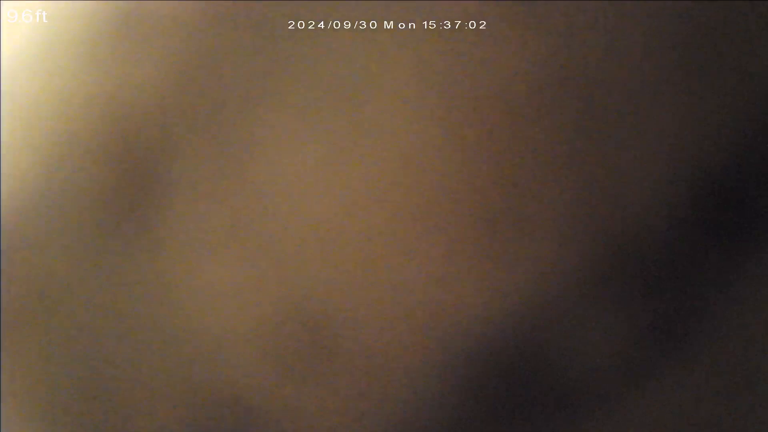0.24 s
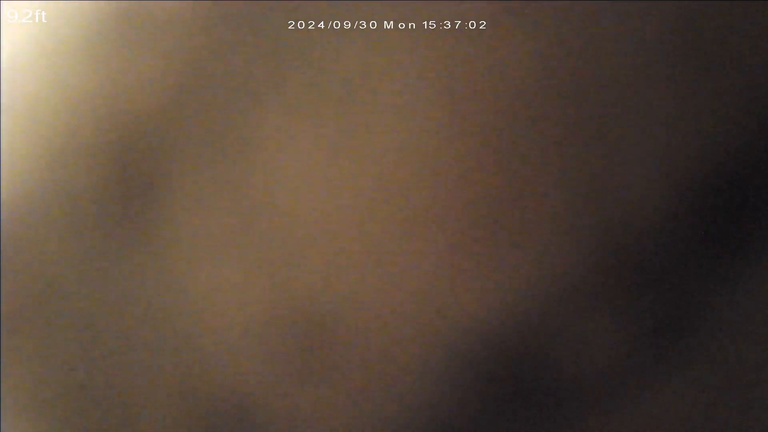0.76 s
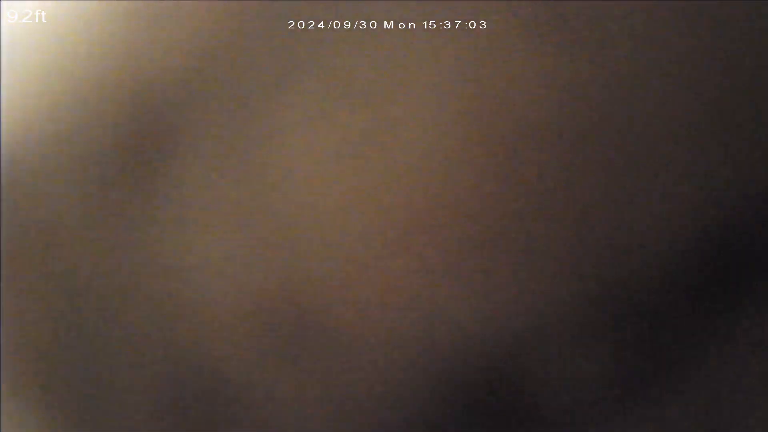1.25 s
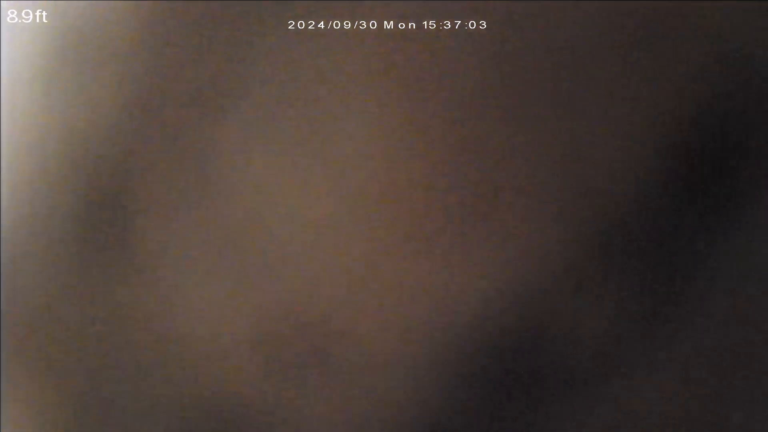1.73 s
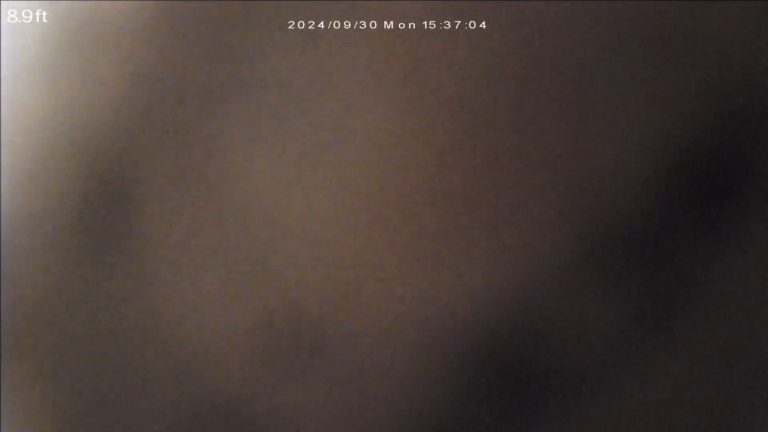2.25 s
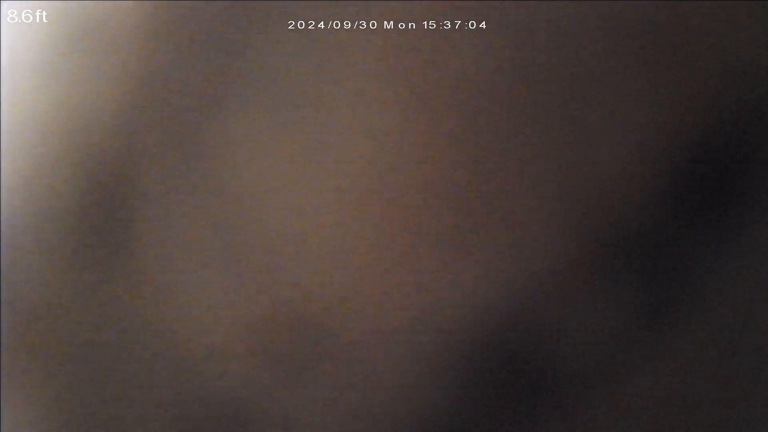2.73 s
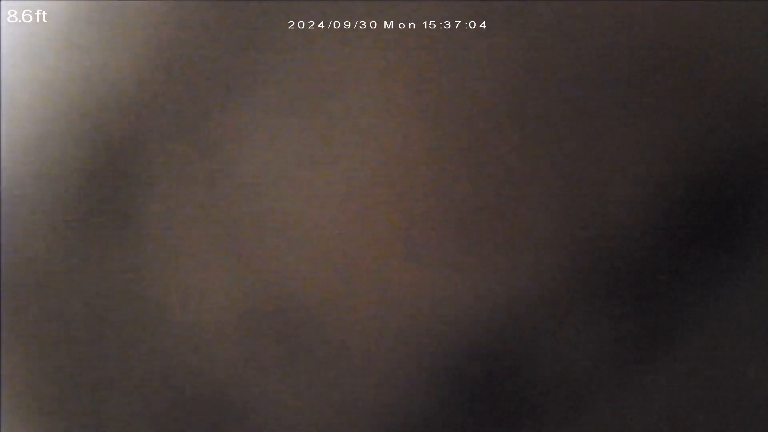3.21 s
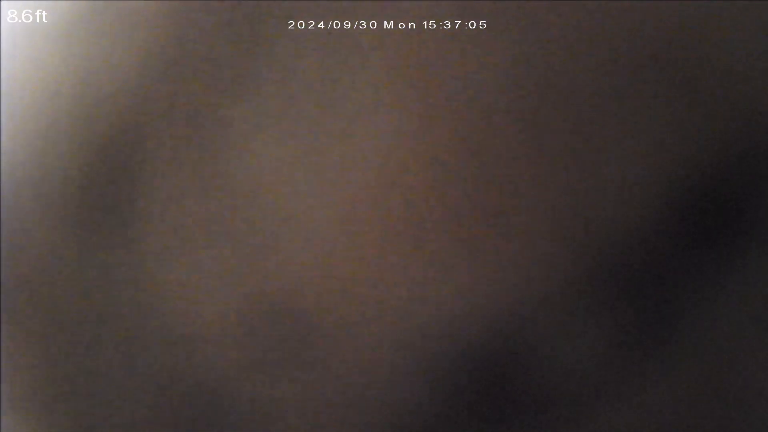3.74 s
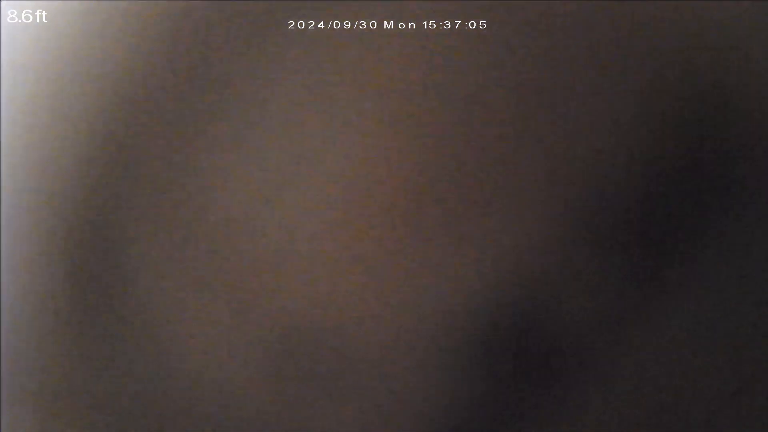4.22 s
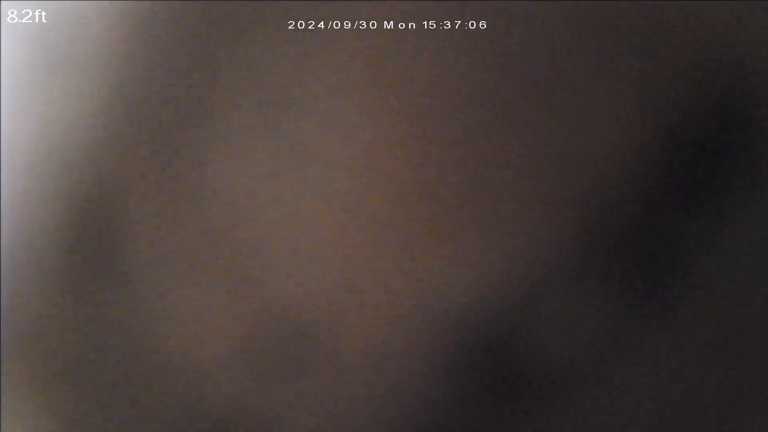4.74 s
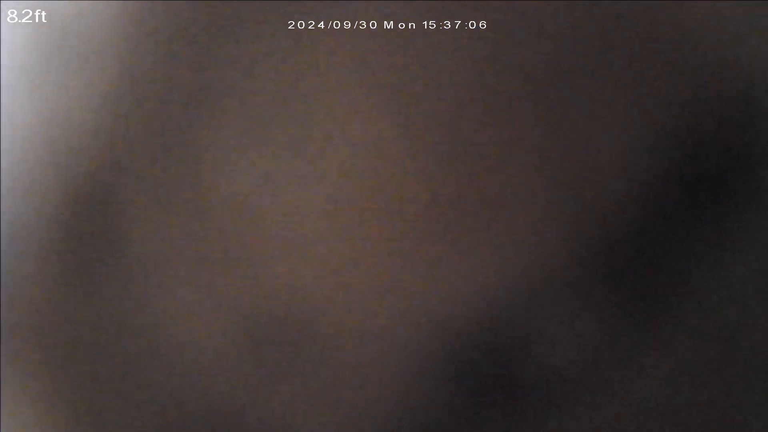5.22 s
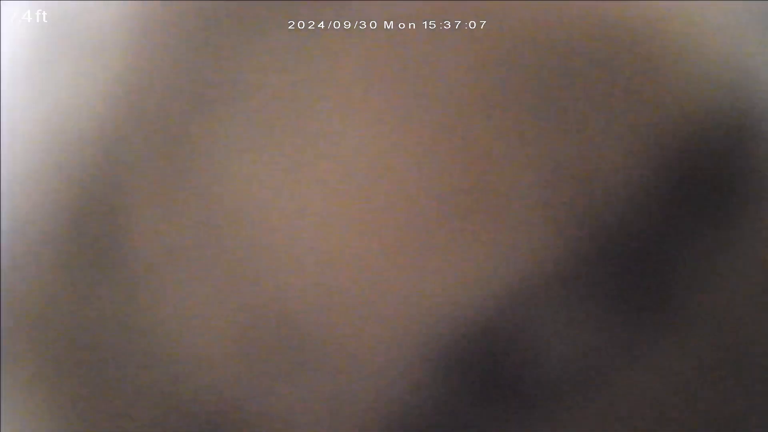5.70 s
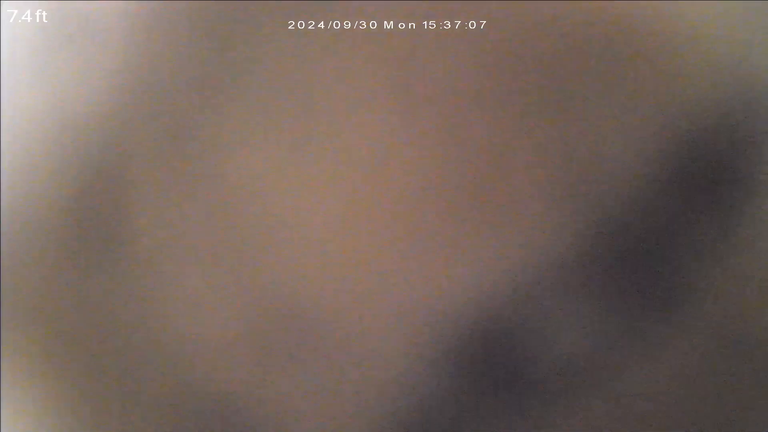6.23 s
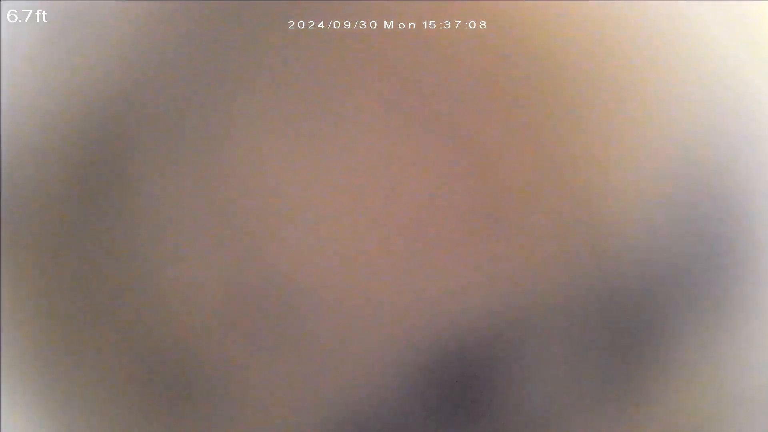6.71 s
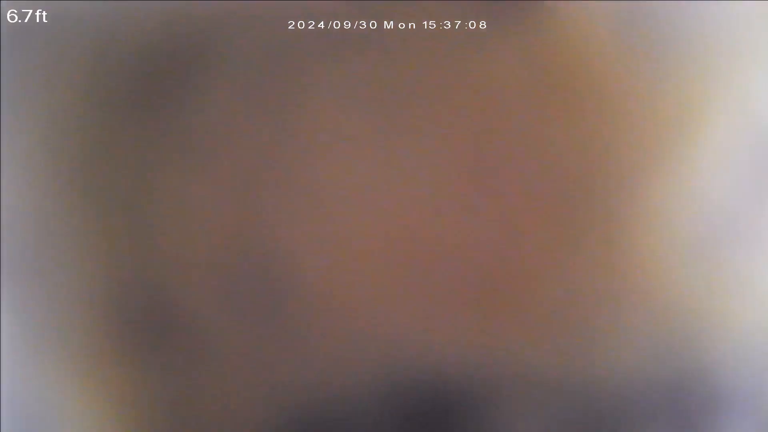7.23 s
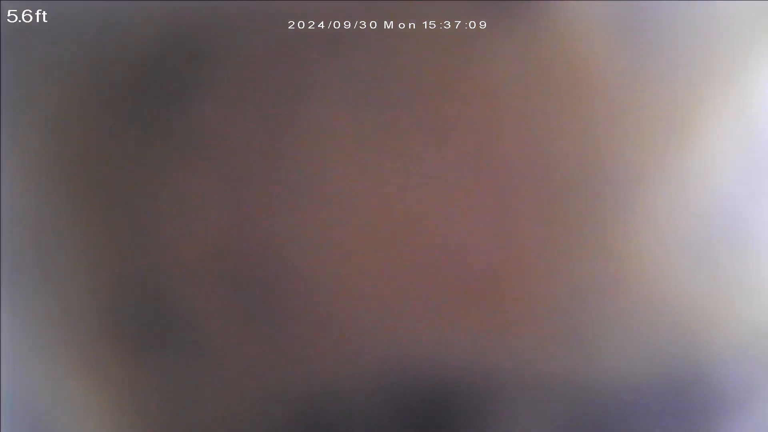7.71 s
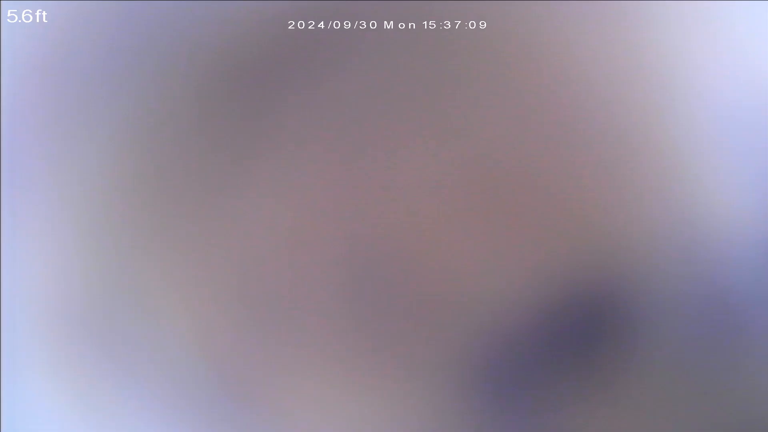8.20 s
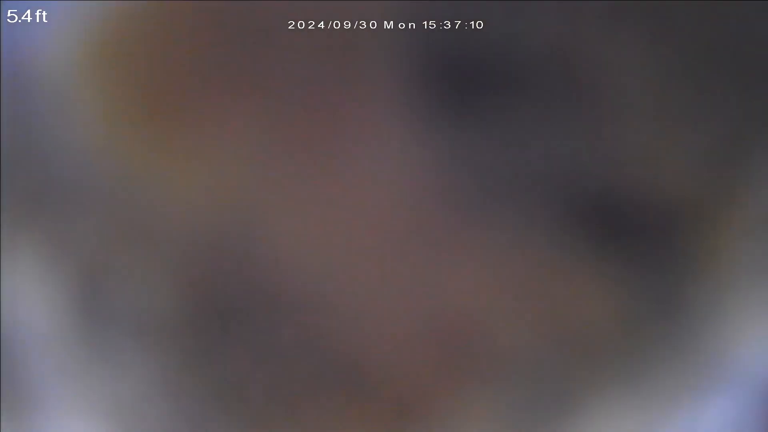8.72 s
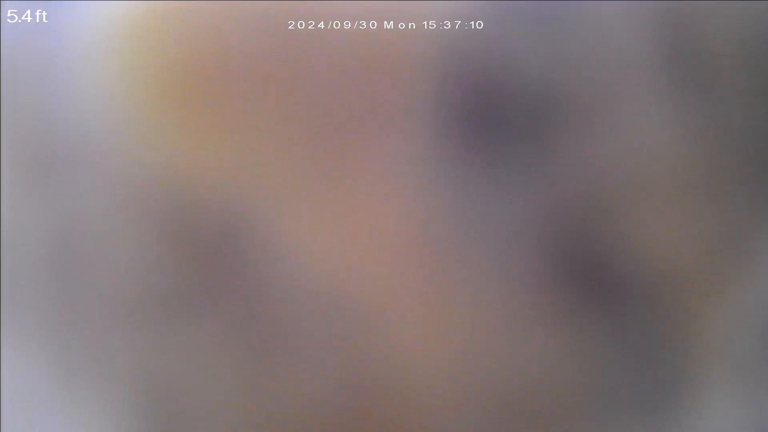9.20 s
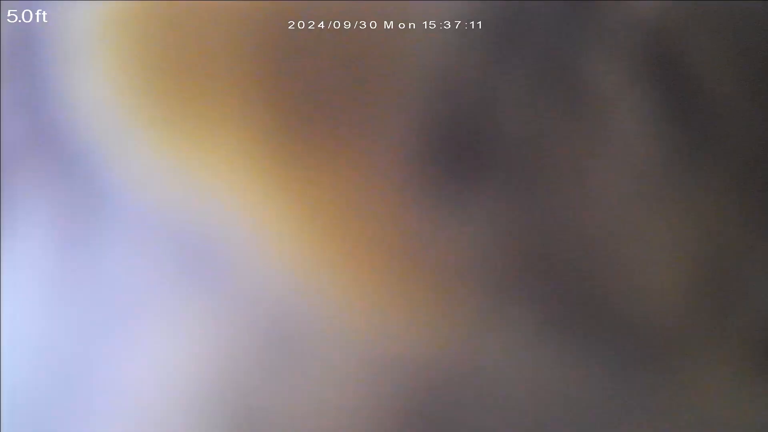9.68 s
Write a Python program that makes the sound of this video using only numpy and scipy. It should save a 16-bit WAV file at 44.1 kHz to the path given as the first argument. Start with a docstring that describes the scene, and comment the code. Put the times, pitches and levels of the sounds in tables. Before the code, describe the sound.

A small recorder in a plastic case is held in the hand pulling a stiff cable from a pipe. Irregular hollow knocks and dull thuds mix with rough scraping; the pipe rings faintly behind them. Blows come sparsely, then grow dense, and the hardest distort. A tiny metallic clink sounds early, and near the end the sound cuts out for an instant. Faint hiss lies beneath, with little room echo.

```python
"""A stiff cable is hauled out of a pipe by a hand that also holds the small recorder.
Pulls and knocks shake the plastic case (resonant modes); the sheath scrapes and blows crack (shaped noise).
The pipe rings on faintly, the room answers, a fitting clinks once; hiss and electrical pips lie beneath.
Loud blows overload the input; the sound drops out once for a moment."""
import sys
import numpy as np
from scipy import signal
from scipy.fft import rfft, irfft, next_fast_len
from scipy.io import wavfile
from scipy.ndimage import uniform_filter1d, map_coordinates

SR = 44100
rng = np.random.default_rng(int(sys.argv[2]) if len(sys.argv) > 2 else 0)


def wav_record(signal):
    """Record a signal, one row per channel, as 16-bit PCM in the file named by sys.argv[1]."""
    frames = np.transpose(np.atleast_2d(signal))
    bounded = np.clip(frames, -1, 1)
    # unit amplitude maps onto the largest positive 16-bit level
    quanta = np.round(bounded * 32767).astype(np.int16)
    wavfile.write(sys.argv[1], SR, quanta)


N = 438794

# base t60s, scaled per layer and knock: shaking; lower and upper crack
JOLT_T60_S, SNAP_T60_S = 0.065, (0.061, 0.049)


def amp(db):
    """Amplitude factor of a level in dB."""
    return 10 ** (np.asarray(db) / 20)


def unit(x):
    """x scaled to rms 1."""
    return x / np.sqrt(np.mean(x ** 2) + 1e-20)


def wobble(rate):
    """A smooth random curve, rate knots a second."""
    knots = rng.standard_normal(int(N * rate / SR) + 4)
    return map_coordinates(knots, [np.arange(N) * rate / SR])


def filtered(x, response):
    """x times a zero-phase response of frequency in Hz."""
    m = next_fast_len(N + SR // 4)
    return irfft(rfft(x, m) * response(np.fft.rfftfreq(m, 1 / SR)), m)[..., :N]


def noise(spectrum, patchy_db, split_hz=None):
    """Patchy coloured noise of rms 1 through the cavity; split: lower and upper part, each rms 1."""
    # air round the microphone: f/Hz, width/Hz, lift/dB
    air_modes = [(1220, 110, 7), (1620, 70, 4), (1900, 170, 9), (3050, 220, 5), (4500, 350, 7),
                 (5350, 450, 7), (8900, 700, 4), (10600, 900, 3)]
    z = signal.stft(rng.standard_normal(N), nperseg=256)[2]
    over_f = uniform_filter1d(rng.standard_normal(z.shape), 5, 0)
    field = uniform_filter1d(over_f, 9, 1)
    patches = signal.istft(z * amp(patchy_db * unit(field)), nperseg=256)[1][:N]
    f, level_db = np.transpose(spectrum)

    def response(hz):
        lift_db = sum(db / (1 + (2 * (hz - c) / w) ** 2) for c, w, db in air_modes)
        return amp(np.interp(np.log(hz + 1), np.log(f + 1), level_db) + lift_db)

    x = unit(filtered(patches, response))
    if split_hz is None:
        return x
    low = filtered(x, lambda hz: 1 / (1 + (hz / split_hz) ** 4))
    return unit(low), unit(x - low)


def drag():
    """Heave, rub, scrape, rasp forces: a hold plus pulls that swell, last, die; the rough sheath catches."""
    # the hand's steady hold on cable and case: t/s, heave/dB, rub/dB, scrape/dB
    grip = [(0.1, -45, -40.5, -48), (0.35, -29, -33, -57), (0.63, -33.5, -52, -62),
            (0.74, -51, -54.5, -56.5), (1.18, -22.5, -36, -57), (1.42, -31, -42, -49.5),
            (1.6, -25.5, -33, -52.5), (1.81, -37, -45, -74), (2.1, -20, -31.5, -65), (2.38, -28, -45, -65),
            (2.57, -31.5, -36.5, -48), (2.95, -33, -41, -52), (3.13, -20.5, -40, -52.5),
            (3.45, -24.5, -32.5, -45), (3.7, -34, -43, -48), (3.8, -22, -35.5, -56.5),
            (4.4, -30.5, -32.5, -39), (4.8, -41, -48.5, -55), (5.86, -33, -36.5, -57),
            (6.22, -33.5, -57.5, -51), (6.45, -25.5, -48.5, -45.5), (7.3, -24, -32.5, -53),
            (7.752, -41, -52.5, -53.5), (8.65, -30, -40.5, -57.5), (8.998, -26.5, -47, -55),
            (9.15, -33, -41, -48), (9.5, -28, -38, -50)]
    # pulls on the cable: start (full force)/s, hold/s, heave/dB, rub/dB, scrape/dB, rasp/dB
    pulls = [(0, 0.0094, -27, -20.5, -30, -36.5), (0.146, 0.035, -30, -27, -37.5, -46.5),
             (0.196, 0.049, -15, -30, -32, -73.5), (1.49, 0.03, -10, -21.5, -39, -66),
             (1.897, 0.064, -24, -33.5, -63, -65), (2.011, 0.01, -14.5, -37.5, -32, -49),
             (2.151, 0.03, -13, -25.5, -30, -45), (2.431, 0.047, -18.5, -25, -36, -44.5),
             (2.79, 0.056, -29, -34, -47, -55), (3, .05, -18.5, -29, -59, -61),
             (3.612, 0.031, -21.5, -64, -48, -75), (4.047, .06, -26, -36.5, -67, -75),
             (4.132, 0.046, -21, -18.5, -48, -64), (4.248, 0.08, -20.5, -17, -32.5, -42),
             (4.453, 0.14, -28.5, -24, -40, -45.5), (4.596, .08, -26, -36, -60, -58.5),
             (4.889, 0.033, -14, -24.5, -37, -44), (5.066, 0.055, -19.5, -29.5, -49.5, -60),
             (5.228, 0.037, -15.5, -23.5, -21.5, -34.5), (5.377, .19, -20.5, -29, -31, -37.5),
             (5.589, 0.17, -17.5, -24.5, -35, -40), (5.979, 0.075, -27, -46, -50.5, -53.5),
             (6.272, 0.041, -29, -33.5, -50.5, -51.5), (6.529, .14, -20, -27, -33.5, -40.5),
             (6.74, 0.03, -14.5, -27.5, -30, -42), (6.781, 0.04, -18.5, -19.5, -28.5, -54),
             (6.885, 0.014, -20, -4.5, -12.5, -40), (6.916, 0.078, -33.5, -20, -32, -38),
             (7.012, 0.093, -23.5, -15.5, -38.5, -47), (7.926, 0.028, -19, -23.5, -44, -60),
             (8.015, 0.091, -19, -17, -38, -38.5), (8.245, 0.034, -24, -16, -56, -36),
             (8.316, 0.19, -21.5, -21.5, -45, -46), (8.795, 0.037, -12.5, -26, -29, -55.5),
             (8.855, 0.098, -22.5, -41, -47.5, -67), (9.216, 0.11, -33, -37.5, -41, -58),
             (9.565, 0.11, -35, -33, -62, -53.5), (9.666, 0.086, -22, -17.5, -52, -53.5),
             (9.785, 0.14, -21, -20, -37.5, -43.5)]
    # decay of heave, rub, scrape, rasp: [dB/s]
    let_go_db_per_s = [221, 260, 302, 352]
    take_up_db_per_s, grip_rasp_db = 502.5, -16  # rasp of the hold is relative to its scrape
    t = np.arange(N) / SR
    s, heave, rub, scrape = np.transpose(grip)
    hold_db = [np.interp(t, s, c) for c in (heave, rub, scrape, scrape + grip_rasp_db)]
    power = amp(hold_db) ** 2
    for start, hold, *level_db in pulls:
        span = slice(max(int((start - .2) * SR), 0), int((start + hold + .4) * SR))
        swell_db = take_up_db_per_s * (t[span] - start)
        die_db = np.outer(let_go_db_per_s, start + hold - t[span])
        fade_db = np.minimum(0, np.minimum(swell_db, die_db))
        power[:, span] += amp(np.c_[level_db] + fade_db) ** 2
    grit_db = wobble(40) + 2.8 * wobble(500)
    return np.sqrt(power) * amp([1.3 * wobble(14), 2.95 * wobble(45), grit_db, grit_db])


def sheath_scrape(scrape, rasp):
    """Sheath friction: noise below about 3 kHz follows the scrape force, above it the rasp force."""
    # sheath noise before the cavity: f/Hz, relative density/dB per Hz
    sheath_colour = [(410, -24.5), (700, 3), (1210, -5), (2000, -10.5), (2700, -19.5), (5000, -31),
                     (5900, -36.5), (6500, -36), (11000, -48), (12000, -50.5), (16000, -51.5)]
    low, high = noise(sheath_colour, 2, split_hz=3000)
    return scrape * low + rasp * high


def knocks():
    """Columns of the knock table; a knock of no stated length gets 1."""
    # t/s, blow/dB, thud/dB re blow, small walls/dB re blow, crack/dB re blow,
    # upper crack/dB re crack, optional length/multiple of usual
    knock_rows = [(0.036, -23, 1.5, -22, -4, -9), (.133, -27, -2, 6, -13, -16),
                  (0.181, 5, -21.5, -1.5, -4, -2.5, 1.1), (.192, 2, -15.5, -3, -3.5, -9.5, .8),
                  (.588, -36.5, -7, -2.5, -9, -26), (0.803, -34.5, 15.5, -18, -25, -13),
                  (0.93, -42, 9, -15, 0, -21), (1.01, -25, 12.5, -9, -13, -27),
                  (1.118, -25, 16.5, -3, -10.5, -25), (1.168, -14, -6, -12, -44, -20),
                  (1.217, -13, -2, -1, -23, -46), (1.3, -25, -9, 3.5, -12, -17.5),
                  (1.378, -26, 2, -5, -8.5, -20), (1.472, 3, -2, -8, -20, -10, 1.3),
                  (1.879, -27, 12, -28, -27, -6), (1.97, -39, 8, 11.5, 0, -11),
                  (2.003, -7.5, -7, 3, -5.5, -18.5), (2.021, -11.5, 8, -3.5, -14.5, -11),
                  (2.08, -27, 0, 4.5, 1, -14.5), (2.126, -13, 0, 12, -5.5, -18.5),
                  (2.13, -4, -10, 4.5, -9, -22.5), (2.158, -10.5, -1.5, -16, -8.5, -13.5),
                  (2.214, -13, 2, -3, -20, -30), (2.4, 0, -14, 0, -13, 6, 2.7),
                  (2.571, -16, 0.5, -6.5, -22, -19), (2.599, -30.5, 12, 1, -0.5, -12),
                  (2.792, -31.5, -9, 0.5, -7, -8), (2.824, -15.5, 1, -25, -26, -2),
                  (2.889, -14.5, 1.5, -13, -38, -14), (2.986, -15, 2, -3, -12, -2.5, 1.3),
                  (3.153, -17, 4.5, -4.5, -25, -11), (3.394, -15, -1.5, -6, -30, -4),
                  (3.609, -18, 7.5, -4, -13.5, -38), (3.634, -35.5, -9, 9.5, 5, 2, .7),
                  (3.721, -20, 8, -18, -24, -16), (3.798, -21.5, 19.5, -5.5, -14.5, -6),
                  (3.819, -24.5, 15.5, -8, -11, -26), (3.93, -29, 12, 0, -5, -13),
                  (4.044, -14.5, -20, -11, -39, -9), (4.079, -9.5, -16, -34, -44, -14),
                  (4.122, -6, -5.5, -2.5, -18, -5), (4.137, -2, -0.5, -0.5, -15, -12.5),
                  (4.197, -17.5, -15, -11, -5, -21), (4.241, -19, -22.5, -13, 8.5, -20.5),
                  (4.256, -1, -18.5, 4.5, -17.5, -8), (4.326, -7.5, -27, -6, -29, -8),
                  (4.446, -16, -25, -6, -20.5, -36), (4.543, -5.5, 7, 1, -5.5, -21),
                  (4.825, -23.5, 7, -3, -10, -17), (4.883, -1, -3, -8, -12, -7, 1.05),
                  (5.053, -24, -5, -0.5, -10, -18), (5.069, -26.5, 10, -11, -4, -22),
                  (5.091, -15, 10, -0.5, -5.5, -24.5), (5.103, -14.5, 10, 2, -8.5, -31),
                  (5.179, -24, 23, 4, -3.5, -13), (5.218, -21, 14.5, -14, 10, -16.5),
                  (5.251, -24.5, 18, -6, 4, -13), (5.274, -18.5, -1, 4.5, -2, -11.5),
                  (5.322, -22.5, -5.5, 1, 4.5, -8), (5.373, 4, -13.5, -1.5, -3, -6.5, .95),
                  (5.464, -17.5, 12, -7.5, -16, 1), (5.562, -19.5, 18.5, 6.5, -25, -10),
                  (5.66, -10, -6, -28, -3, -16.5), (5.718, -10.5, -5.5, -17, 2.5, -18),
                  (5.735, -1.5, 3, -22, -7.5, -16), (5.747, -4, -6, -11.5, -7, -19.5),
                  (6.002, -30, 3, 0.5, -1, -15.5), (6.244, -27.5, 4.5, 0, -5.5, -16),
                  (6.276, -24, 12.5, 0.5, -7.5, -13), (6.526, -5.5, 2, -7.5, -21, -7.5),
                  (6.537, -14, 4, -11, -15, -19), (6.598, 3, -4.5, -5.5, -9, -24, 1.1),
                  (6.648, -6.5, -0.5, 1, -8, -24), (6.74, -13.5, 4, -6, -2.5, -14.5),
                  (6.764, -3.5, -9, -0.5, 4, -15.5, .8), (6.824, -1.5, -4, 2.5, -7, -15),
                  (6.835, -5, -3, 1, -1, -16), (6.872, 3.5, -2, 4, 1.5, -12, 1.2),
                  (6.928, 2.5, -12.5, -4.5, -27.5, -12), (6.977, -5, -16, -18.5, -19.5, -6.5),
                  (7.056, -9, -6, 2, -6, 0), (7.085, -13, 0.5, -4, -11, -23),
                  (7.292, -21, 3, -0.5, -4, -23), (7.643, -32.5, -20, -7, -10, -12),
                  (7.817, -31, 13, -7, -22, -16), (7.907, -23, 0, 6, -9.5, -21),
                  (7.928, -13, -17, 2.5, -32, -12), (7.991, -17.5, -8, 4.5, -11, -5),
                  (8.008, -4, -4, -0.5, -12.5, -16), (8.041, -1, -6, -2, 0, -7, 1.7),
                  (8.279, -11, 13, 5, -22.5, -5, 1.4), (8.354, -13, -7.5, 6, -25.5, -16),
                  (8.428, -0.5, -20, -5, -32, -21), (8.678, -24.5, 4, -7, -24, -6),
                  (8.778, -14.5, -18, 0, -0.5, -14), (8.784, -2.5, -10.5, 4, 5, -13, 1.25),
                  (9.128, -38.5, -8, 9, -10, -13), (9.207, -28.5, -14, 6, -27, -12),
                  (9.409, -21, 0, -2, -5.5, -19), (9.426, -16, 6.5, 3.5, -4.5, -1.5, .6),
                  (9.65, -7, -3, -9, -39, -7.5), (9.694, -5.5, -15, -6, -33, -13),
                  (9.799, -9, -13, -21, -29, -12), (9.876, -17.5, -15, -4, 0.5, -14.5),
                  (9.92, -17.5, 3, 4.5, -3, -6)]
    return np.transpose([(*row, 1)[:7] for row in knock_rows])


def jolts(level_db, t60_s, rise_s):
    """Force envelope of all knocks: a rise, then an exponential fall, shorter for hard blows."""
    power, t = np.zeros(N + SR), np.arange(SR // 3) / SR
    s, blow, *_, length = knocks()
    # share of t60 per dB, counted from a -15 dB blow; floor 3 ms
    falls_s = np.maximum(t60_s * length * (1 - 0.0249 * (blow + 15)), .003)
    rise = 1 - np.exp(-t / rise_s)
    for at, db, fall_s in zip(np.round(s * SR).astype(int), level_db, falls_s):
        power[at:][:len(t)] += (amp(db - 60 * t / fall_s) * rise) ** 2
    return np.sqrt(power[:N])


def ring(force, modes, kick_db):
    """Modes shaken by own rough copies of the force (steady 1: about rms 1), kicked once per knock."""
    out, at = np.zeros(N), np.round(knocks()[0] * SR).astype(int)
    chance = rng.standard_normal((len(at), len(modes), 2))
    kicks = amp(kick_db[:, None] + 1.7 * chance[..., 0]) * np.sign(chance[..., 1])
    contact = np.hanning(14) / np.hanning(14).sum()  # about a third of a millisecond
    for (hz, db, t60_s), kick in zip(modes, kicks.T):
        r, w = amp(-60 / (t60_s * SR)), 2 * np.pi * hz / SR
        push = 2 * np.sqrt(1 - r) * force * rng.standard_normal(N)
        push[at[:, None] + np.arange(len(contact))] += kick[:, None] * contact
        out += signal.lfilter([amp(db) * np.sin(w)], [1, -2 * r * np.cos(w), r * r], push)
    return out / np.sqrt(sum(amp(db) ** 2 for _, db, _ in modes))


def rocking(heave):
    """The case rocks in the hand: low modes driven by heaves and thuds."""
    # rocking modes: f/Hz, relative level/dB, t60/s
    sway_modes = [(30, -30, .1), (68.9, -3, 0.43), (121.1, 0, 0.14), (135.1, -2.5, 0.21)]
    _, blow, thud, *_ = knocks()
    kick_db = blow + thud - 4
    thuds = jolts(kick_db, 1.9 * JOLT_T60_S, rise_s=0.015)
    return ring(np.hypot(heave, thuds), sway_modes, kick_db)


def case_walls(rub, strike):
    """Case walls ring: a flat blow favours the large ones, a hard edge the small ones."""
    # large (3), middle (3) and small (4) walls: f/Hz, relative level/dB, t60/s
    wall_modes = [(218.6, -6.5, 0.06), (250.3, -7, 0.15), (319, -10.5, 0.19), (375.6, -6.5, 0.12),
                  (416, -2, 0.069), (488.6, 0, 0.063), (662.5, -1.5, 0.059), (818.7, -3.5, 0.028),
                  (943, -24, 0.028), (1164, -8, 0.027)]
    _, blow, thud, hard, *_ = knocks()
    broad = -3.5 + 0.54 * thud  # dB re blow
    flat = jolts(blow + broad - 3, 1.76 * JOLT_T60_S, rise_s=0.004)
    edge = jolts(blow + hard - 3, 1.23 * JOLT_T60_S, rise_s=0.0024)
    large = ring(np.hypot(rub * amp(-4.5), flat), wall_modes[:3], blow + broad - 4)
    middle = ring(np.hypot(rub, strike), wall_modes[3:6], blow - 3)
    hollow = ring(rub * amp(-2), wall_modes[5:6], blow - 6)  # rubbing favours the top middle mode
    small = ring(np.hypot(rub * amp(-11), edge), wall_modes[6:], blow + hard - 4)
    return large + middle + hollow + small


def pipe_ring(rub, strike):
    """The pipe's mostly longer modes, driven by rubbing and blows."""
    # pipe modes: f/Hz, relative level/dB, t60/s
    pipe_modes = [(220.3, -11, 0.93), (254.2, -6, 0.48), (284.6, -9.5, 0.61), (368, -6.5, 0.67),
                  (447.5, -11, 1.0), (525.4, -4, 0.24), (567, -14, 0.12), (750, -17.5, 0.74),
                  (880, -24.5, 0.89), (992, -37.5, 0.24), (1270, -26, 0.43), (1850, -23, .15)]
    blow = knocks()[1]
    return amp(-3.5) * ring(np.hypot(rub * amp(-6), strike), pipe_modes, blow - 15)


def room(x):
    """Noise tail, each frequency of the walls' answer dying at its own speed."""
    # room decay: f/Hz, t60/s
    room_decay = [(200, 0.48), (600, 0.6), (2000, 0.049), (8000, 0.21)]
    hz, t, z = signal.stft(rng.standard_normal(SR // 2), SR, nperseg=256)
    f, t60_s = np.transpose(room_decay)
    t60_at_hz = np.interp(np.log(hz + 1), np.log(f), t60_s)
    tail = signal.istft(z * amp(-60 * t / t60_at_hz[:, None]), SR, nperseg=256)[1]
    delayed = np.pad(x, (500, 0))  # samples
    return signal.fftconvolve(delayed, tail / np.linalg.norm(tail))[:N]


def hiss():
    """Surroundings and preamplifier: patchy noise of slowly wandering level."""
    # noise floor before the cavity: f/Hz, relative density/dB per Hz
    hiss_colour = [(18, -37.5), (40, 1), (300, -15), (530, -10.5), (900, -33), (1500, -38), (2300, -37.5),
                   (5000, -48.5), (10000, -51), (16000, -58)]
    return amp(-42 + 1.3 * wobble(3.1)) * noise(hiss_colour, 2.3)


def pips():
    """The electronics leak a short high tone at a steady rate, of uneven strength."""
    hz, level_db, half_s = 8200, -72, .004  # half length to 1/e
    rate_hz, first_s = 25, .02
    t = np.arange(N) / SR
    cycle = (t - first_s) * rate_hz
    window = np.exp(-((cycle - np.round(cycle)) / (rate_hz * half_s)) ** 2)
    tone = np.sin(2 * np.pi * hz * t + 1.5 * wobble(60))
    return amp(level_db + 4.3 * wobble(25)) * window * tone


def cracks():
    """Each knock snaps in two noise bands; loose parts chatter on after the snap."""
    # crack noise before the cavity: f/Hz, relative density/dB per Hz
    crack_colour = [(410, -21.5), (700, -6), (1400, -2.5), (1730, -3), (2460, -9), (3370, -11),
                    (6230, -27.5), (10900, -34), (16000, -46.5)]
    _, blow, _, _, crack, bright, _ = knocks()
    bands = noise(crack_colour, 1.4, split_hz=4300)
    out = np.zeros(N)
    for level, t60_s, band in zip((crack, crack + bright), SNAP_T60_S, bands):
        snap = jolts(blow + level - 4.0, t60_s, rise_s=0.00071)
        rattle = jolts(blow + level - 30, 3.1 * t60_s, rise_s=.003)
        out += np.hypot(snap, rattle) * band
    return out


def clink():
    """A touched metal fitting rings briefly, a little unsteadily: decaying sines."""
    # fitting modes: f/Hz, relative level/dB, t60/s
    fitting_modes = [(3800, 0, .22), (4600, -3, .08), (5900, -3, .12)]
    start_s, level_db = 2.161, -41
    t = np.maximum(np.arange(N) / SR - start_s, 0)
    out = np.zeros(N)
    for hz, db, t60_s in fitting_modes:
        out += amp(db - 60 * t / t60_s + 5 * wobble(180)) * np.sin(2 * np.pi * hz * t)
    return amp(level_db) * out


def scene():
    """Sum of case, cable, pipe, room and noise floor."""
    heave, rub, scrape, rasp = drag()
    strike = jolts(knocks()[1] - 2, JOLT_T60_S, rise_s=0.0011)
    treble = sheath_scrape(scrape, rasp) + cracks() + clink()
    near = case_walls(rub, strike) + treble
    floor = hiss() + pips()
    return (rocking(heave) + near + pipe_ring(rub, strike) + amp(-23.0) * room(near) + floor)[None]


def record(dry):
    """The microphone blocks deepest bass; the input clips hard, loses one stretch, ends at its band limit."""
    offset, ceiling, top_hz = -.008, .71, 16100  # offset: steady input voltage
    drop_start_s, drop_end_s, drop_db = 8.1365, 8.2525, -57.0
    coupled = filtered(dry, lambda hz: hz ** 2 / (hz ** 2 + 33 ** 2)) + offset
    clipped = coupled / (1 + np.abs(coupled / ceiling) ** 14) ** (1 / 14)
    t = np.arange(N) / SR
    kept = np.where((t > drop_start_s) & (t < drop_end_s), amp(drop_db), 1)
    kept = uniform_filter1d(kept, size=15)  # the cut takes a third of a millisecond
    return filtered(clipped * kept, lambda hz: hz < top_hz)


dry = scene()
out = record(dry)
wav_record(out)
```